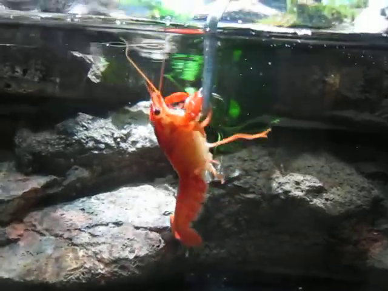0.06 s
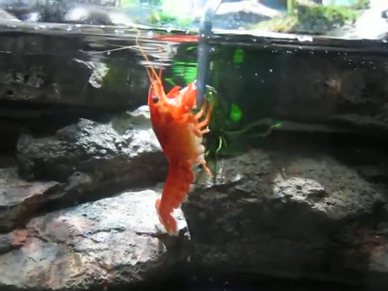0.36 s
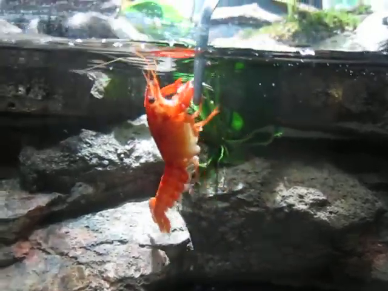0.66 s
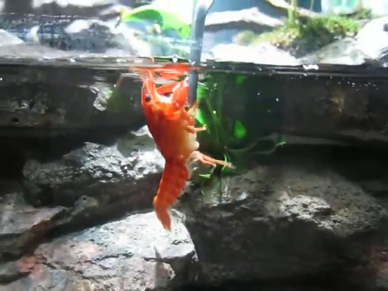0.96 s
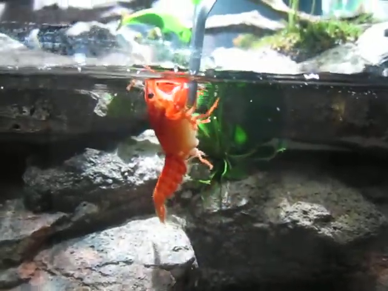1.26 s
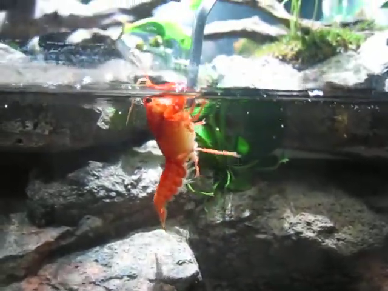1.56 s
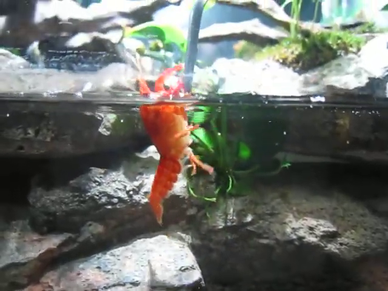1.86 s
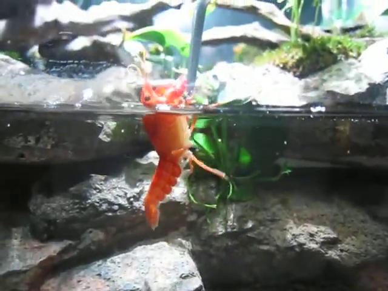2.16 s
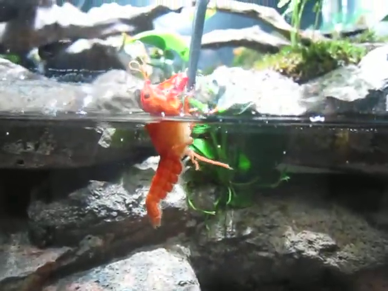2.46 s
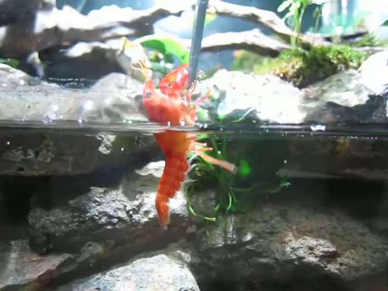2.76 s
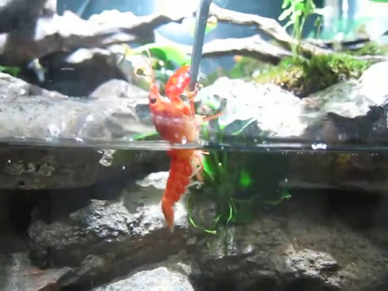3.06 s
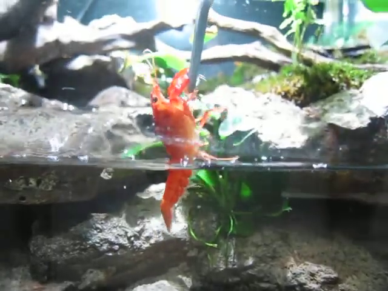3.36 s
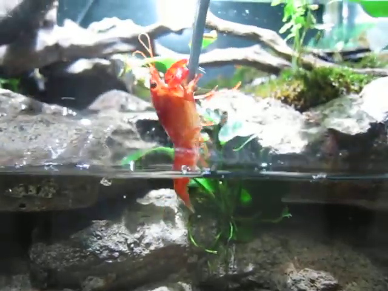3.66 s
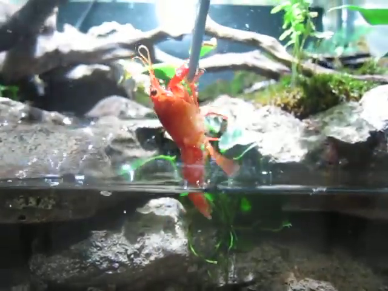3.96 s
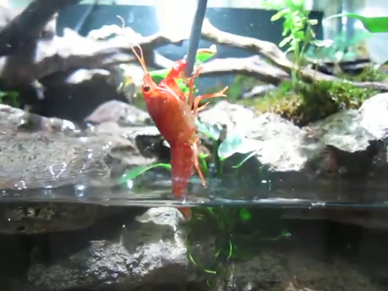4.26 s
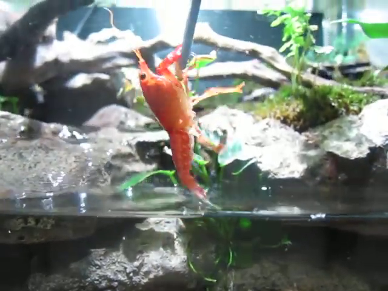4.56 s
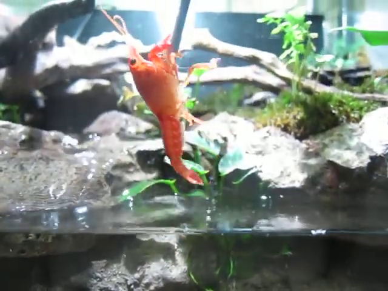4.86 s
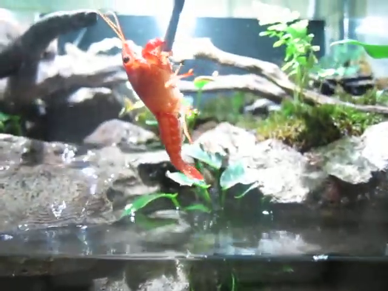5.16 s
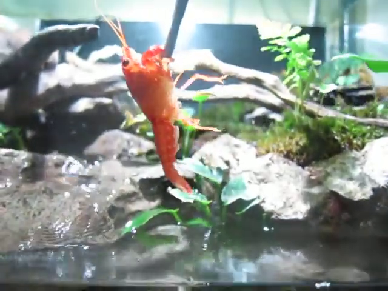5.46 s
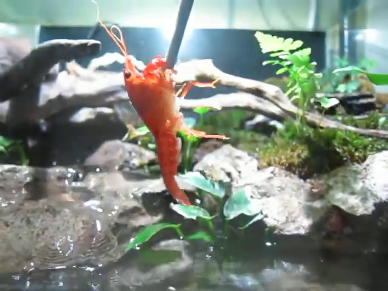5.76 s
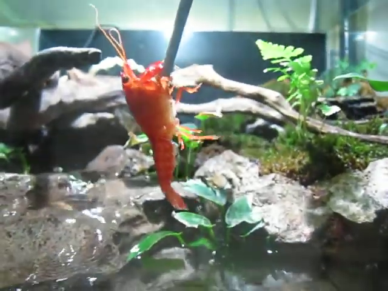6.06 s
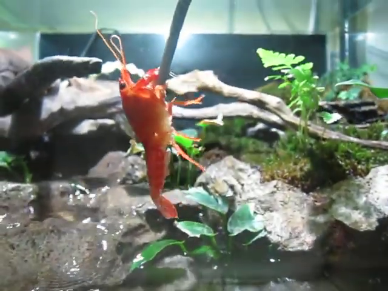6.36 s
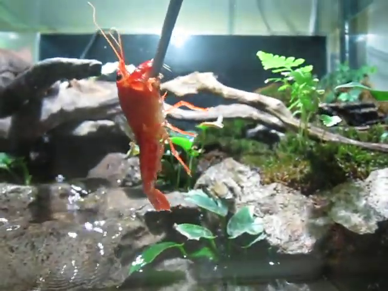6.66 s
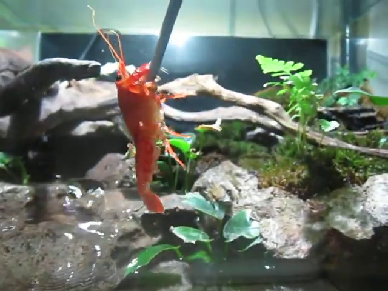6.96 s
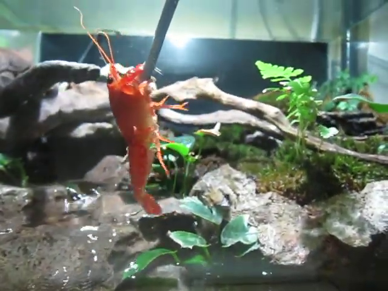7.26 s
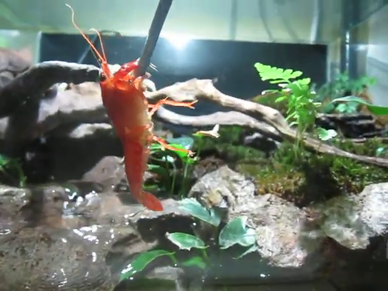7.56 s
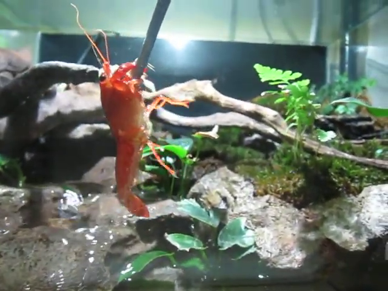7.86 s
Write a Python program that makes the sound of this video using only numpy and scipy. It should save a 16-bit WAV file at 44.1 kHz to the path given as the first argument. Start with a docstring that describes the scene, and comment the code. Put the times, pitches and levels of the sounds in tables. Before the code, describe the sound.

Water trickles and drips into an aquarium over a low pump hum, with three sharp clicks and soft microphone bumps.

```python
"""Beside an aquarium, heard through the microphone of a hand-held camera. A pump hums, a low drone climbs in
pitch, the camera takes soft bumps and rustles, and a thin whistle rises at the end. Water trickles into the
tank: a low gurgle, splashing, fine fizz and single ringing bubbles. A crayfish is lifted out with tongs; three
sharp clicks make the camera's gain control duck and slowly recover, and fainter ticks of spatter snap in
between."""
import sys
import numpy as np
from scipy import signal
from scipy.fft import rfft, irfft
from scipy.io import wavfile
from scipy.ndimage import uniform_filter1d, minimum_filter1d

SR = 44100
rng = np.random.default_rng(int(sys.argv[2]) if len(sys.argv) > 2 else 0)


def dump(signal):
    """Clip the signal to [-1, 1] and save it as 16-bit WAV at the path in sys.argv[1]."""
    limited = np.clip(np.atleast_2d(signal).T, -1, 1)
    pcm = np.round(limited * 32767).astype(np.int16)
    wavfile.write(sys.argv[1], SR, pcm)


N = 352800
TIME = np.arange(N) / SR


def undb(db):
    """Decibels to gain."""
    return 10 ** (np.asarray(db) / 20)


def unit(x):
    """Scale to an rms of 1."""
    return x / np.sqrt(np.mean(x ** 2))


def curves(table):
    """The columns of a table, joined by straight lines in time."""
    time_s, *columns = np.transpose(table)
    return [np.interp(TIME, time_s, column) for column in columns]


def add(out, start_s, x):
    """Mix x into out from start_s on."""
    i = int(np.clip(start_s * SR, 0, N - 1))
    out[i:i + len(x)] += x[:N - i]


def colour(x, gain):
    """Filter by a gain that is a function of frequency."""
    f = np.maximum(np.fft.rfftfreq(len(x), 1 / SR), 1)
    return irfft(rfft(x) * gain(f), len(x))


def slope(points, f):
    """Gain at the frequencies f of a spectrum of (frequency_hz, level_db) points."""
    hz, db = np.transpose(points)
    return undb(np.interp(np.log(f), np.log(hz), db))


def band(f, low_hz, high_hz):
    """Gain of a steep high-pass at low_hz and a steep low-pass at high_hz."""
    return ((1 + (low_hz / f) ** 12) * (1 + (f / high_hz) ** 12)) ** -.5


def walk(rate_hz):
    """Straight glides between random values; rms 1."""
    step = max(int(SR / rate_hz), 2)
    held = np.repeat(rng.standard_normal(N // step + 1), step)[:N]
    return unit(uniform_filter1d(held, step))


def tone(hz, db):
    """A sine of the given rms level; the pitch may move."""
    phase = np.cumsum(hz * np.ones(N)) / SR + rng.random()
    return np.sqrt(2) * undb(db) * np.sin(2 * np.pi * phase)


def decay(t, t60):
    """An exponential fall that is 60 dB down at t60."""
    return np.exp(-np.log(1000) * t / t60)


def damped(hz, t60_s):
    """A short ring that starts from rest."""
    t = TIME[:SR // 20]
    return np.sin(2 * np.pi * hz * t) * decay(t, t60_s)


# Rumble of the room around the tank: frequency_hz, density_db
RUMBLE_SPECTRUM = [(12, -3), (26, 4.5), (38, -0.5), (50, -12), (75, -3.5), (110, -12.5), (160, -21),
                   (300, -78)]
# The pump's deepest hum, at twice the mains frequency: time_s, level_db
PUMP_LEVEL = [(0.4, -34), (1.4, -32.5), (2.4, -35.5), (5.3, -34), (6.3, -32.5), (8, -31.5)]
# The pump's overtones: mains_multiple, level_db
PUMP_OVERTONES = [(5, -47), (6, -48), (7, -50), (8, -48.5), (11, -53.5)]
# The low drone behind it: time_s, level_db
DRONE_LEVEL = [(0, -34.5), (1, -29), (2.2, -30.5), (2.8, -35.5), (4.6, -45), (5.2, -28.5), (6.2, -28.5),
               (6.7, -38), (7.5, -31), (7.85, -23.5)]


def room(mains_hz=50, drone_start_hz=63.5, climb_hz_per_s=5.5, drone_top_hz=86.14):
    """The pump hums over a deep rumble and beats against an unsteady drone that climbs, then settles."""
    hum = tone(2 * mains_hz, curves(PUMP_LEVEL)[0])
    hum += sum(tone(multiple * mains_hz, db + walk(4.4)) for multiple, db in PUMP_OVERTONES)
    drone_hz = np.minimum(drone_start_hz + climb_hz_per_s * TIME, drone_top_hz)
    drone = tone(drone_hz * (1 + .012 * walk(6)), curves(DRONE_LEVEL)[0] + 1.5 * walk(8))
    rumble = unit(colour(rng.standard_normal(N), lambda f: slope(RUMBLE_SPECTRUM, f)))
    return hum + drone + undb(-28.5) * rumble


# Faint strands above the whistle: pitch_ratio, final_level_db
WHISTLE_STRANDS = [(1.09, -69), (1.33, -71), (1.43, -75)]


def whistle(start_s=7.35, rise_s=.65, from_hz=7050, to_hz=9130, from_db=-61, to_db=-46.5):
    """A thin, broken whistle slides up and swells ever faster, with airy strands above it."""
    rise = np.clip((TIME - start_s) / rise_s, 0, 1)
    hz = from_hz + (to_hz - from_hz) * rise ** 2
    db = from_db + (to_db - from_db) * rise ** 3
    strands = sum(tone(hz * ratio * (1 + .012 * walk(1200)), strand_db + 4 * walk(25))
                  for ratio, strand_db in WHISTLE_STRANDS)
    core = tone(hz * (1 + .014 * walk(1200)), db + 3 * walk(90))
    return (core + np.sqrt(rise) * strands) * (rise > 0)


# Colour of the water from beside the tank: frequency_hz, density_db
WATER_SPECTRUM = [(140, -4), (195, -2), (270, -3.5), (420, -7), (560, -8), (740, -18.5), (1100, -19.5),
                  (1550, -20), (2140, -19), (7000, -19), (8600, -24), (10500, -29), (16000, -43.5)]
# Resonances of the air space over the water: centre_hz, width_hz, boost_db
AIR_RESONANCES = [(1360, 90, 3.5), (2150, 180, 3), (3100, 260, 2), (4020, 300, 3), (5500, 450, 3),
                  (6900, 400, 2.5), (8300, 700, 3)]
# Reflections off the glass, nearest wall first: delay_s, level_db
GLASS_WALLS = [(.0025, -16), (.0043, -18), (.0071, -18)]


def tank(f):
    """Gain of the water's colour, lifted by the air resonances and rippled by the wall reflections."""
    reflections = sum(undb(db) * np.exp(-2j * np.pi * f * delay_s) for delay_s, db in GLASS_WALLS)
    boost_db = sum(db / (1 + (2 * (f - hz) / width_hz) ** 2) for hz, width_hz, db in AIR_RESONANCES)
    return slope(WATER_SPECTRUM, f) * np.abs(1 + reflections) * undb(boost_db)


def glass_echo(x, t60_s, wet_db):
    """Dense, short reflections between the glass walls."""
    t = TIME[:SR // 3]
    tail = rng.standard_normal(len(t)) * decay(t, t60_s) * (t > .002)
    return x + undb(wet_db) * signal.fftconvolve(x, tail / np.linalg.norm(tail))[:N]


def spray(low_hz, high_hz, spread_db, flicker_db, surge_db, bands):
    """Countless tiny, uneven bursts in the tank; the bands flicker on their own and surge together."""
    edges = np.geomspace(low_hz, high_hz, bands + 1)
    out = np.zeros(N)
    for low, high in zip(edges, edges[1:]):
        bursts = rng.standard_normal(N) * np.repeat(undb(spread_db * rng.standard_normal(N // 20)), 20)
        out += colour(bursts, lambda f: band(f, low, high)) * undb(flicker_db * walk(45))
    return unit(colour(out, tank) * undb(surge_db * walk(55)))


# Handling noise close to the microphone: middle_s, length_s, rub_level_db
HANDLING_RUSTLES = [(0.095, 0.37, -41.5), (0.593, 0.18, -32), (5.588, 0.072, -41)]


def rustles(ring_over_rub_db=3):
    """Something rubs near the microphone: a dull, grainy noise with a deep ring swells and stops."""
    swell = sum(undb(db) * np.cos(np.pi * np.clip((TIME - middle_s) / length_s, -.5, .5))
                for middle_s, length_s, db in HANDLING_RUSTLES)
    rub = spray(190, 1950, spread_db=3, flicker_db=2, surge_db=2, bands=3)
    # The crossed band edges leave one narrow peak near 142 Hz.
    ring = unit(colour(rng.standard_normal(N), lambda f: band(f, 147.84, 137.06)))
    return swell * (rub + undb(ring_over_rub_db) * ring)


# Bumps on the camera, right at the microphone: start_s, pitch_hz, peak_db, length_s
CAMERA_BUMPS = [(1.433, 350, -21, 0.01), (1.438, 114, -15.5, 0.037), (6.442, 64.5, -11, 0.044),
                (6.444, 125, -24, 0.043), (7.194, 64.5, -5, 0.02)]


def bumps():
    """Soft knocks on the camera body swing for a few cycles."""
    out = np.zeros(N)
    for start_s, hz, db, length_s in CAMERA_BUMPS:
        t = TIME[:int(length_s * SR)]
        swing = np.cos(2 * np.pi * hz * (t - length_s / 2))
        add(out, start_s, -undb(db) * np.sin(np.pi * t / length_s) * swing)
    return out


def bubble(hz, cycles, glide):
    """A bubble rings, dies away and rises in pitch as it nears the surface."""
    age = np.linspace(0, 1, int(cycles * SR / hz))
    phase = cycles * (age + glide * age ** 2 / 2)
    onset = 1 - np.exp(-age / .018)
    return np.sin(2 * np.pi * phase) * decay(age, 1) * onset


# Runs of bubbles in the tank, each around one pitch: start_s, end_s, pitch_hz, width_hz, level_db
BUBBLE_RUNS = [(2.15, 2.45, 310, 52, -38.5), (3.946, 3.975, 302, 40, -27.5), (3.85, 4.223, 2300, 230, -51),
               (4.46, 4.719, 2340, 180, -49.5), (5.47, 5.6, 2290, 280, -45), (0.05, 0.33, 1365, 78, -51.5),
               (2.87, 3.33, 5400, 280, -55.5), (7.72, 8.001, 2130, 250, -48.5),
               (7.83, 7.94, 2800, 910, -45), (7.37, 8.0, 6000, 200, -55.5)]


def bubble_runs():
    """Quick runs of like-sized bubbles merge into a rough note."""
    out = np.zeros(N)
    for start_s, end_s, hz, width_hz, db in BUBBLE_RUNS:
        run, length_s = np.zeros(N), end_s - start_s
        for when, detune, strength in rng.random((160, 3)):
            ring = bubble(hz + width_hz * (detune - .5), cycles=6 * hz / width_hz, glide=.015)
            add(run, start_s + when * length_s, strength * ring)
        out += unit(run) * undb(db) * np.sqrt(length_s * SR / N)  # level over the run's own length
    return out


# The loudest drops on the water's surface: start_s, pitch_hz, relative_level_db
DROPS = [(.178, 6600, -28), (.325, 1365, -35), (.425, 2400, -29.5), (.889, 2130, -31.5),
         (1.251, 1790, -37.5), (1.479, 1820, -34), (1.59, 4170, -33), (1.655, 3440, -32), (1.72, 3150, -31),
         (1.96, 3380, -32.5), (2.04, 4070, -35.5), (2.124, 2070, -35), (2.201, 5720, -31),
         (2.398, 4920, -31.5), (2.453, 1320, -30), (2.53, 2900, -33.5), (2.636, 3970, -33),
         (3.284, 6360, -34), (3.402, 2980, -32), (3.797, 2940, -33), (4.506, 2580, -31.5),
         (4.572, 1360, -31.5), (4.836, 2100, -32.5), (5.056, 3320, -35), (5.306, 2970, -37),
         (5.394, 2070, -30.5), (5.778, 3260, -31), (5.892, 2140, -25.5), (5.934, 2130, -38),
         (6.172, 2160, -33), (6.204, 3240, -33), (6.294, 2174, -33), (6.3, 3050, -33), (6.525, 2950, -34),
         (6.83, 3310, -34.5), (7.176, 6630, -28.5), (7.29, 8500, -31.5), (7.295, 2980, -33),
         (7.5, 3300, -32), (7.539, 2180, -32.5), (7.886, 4630, -34.5)]


def drips():
    """A drop makes one main bubble and a fading cluster of like size; smaller bubbles come in numbers."""
    out = np.zeros(N)
    for start_s, hz, db in DROPS:
        add(out, start_s, undb(db - 2) * bubble(hz, cycles=124, glide=.04))
        for lag, detune in rng.random((10, 2))[:int(hz / 500)]:
            ring = bubble(hz * (1 + .2 * (detune - .5)), cycles=75, glide=.06)
            add(out, start_s + .05 * lag, undb(db - 3.5 - 7 * lag) * ring)
    return glass_echo(out, t60_s=.16, wet_db=-4)


def swarm(low_hz, high_hz, cycles, range_db, count):
    """Bubbles born at random moments: many faint ones, a few strong."""
    out = np.zeros(N)
    for when, pitch, strength in rng.random((count, 3)):
        ring = bubble(low_hz * (high_hz / low_hz) ** pitch, cycles, glide=.086)
        add(out, when * N / SR, undb(range_db * strength ** 2) * ring)
    return unit(glass_echo(colour(out, tank), t60_s=.09, wet_db=-9))


# The stream where it meets the water, before each layer's trim: time_s, gurgle_db, splash_db, fizz_db
STREAM_LEVELS = [(0.0, -33.5, -44.5, -43), (0.38, -36.5, -46, -45), (0.67, -31, -42, -43.5),
                 (0.96, -38, -48, -43.5), (2.0, -37.5, -49.5, -46.5), (3.15, -32.5, -44.5, -42.5),
                 (3.57, -35.5, -48.5, -45), (4.07, -33.5, -46, -43.5), (4.33, -34, -50, -45.5),
                 (4.56, -35, -44, -42.5), (4.76, -34.5, -49, -44.5), (5.0, -32.5, -44.5, -41),
                 (5.32, -33.5, -44.5, -42.5), (5.58, -31.5, -39, -39), (5.75, -33.5, -44.5, -42),
                 (6.34, -34, -45.5, -45), (6.68, -37, -52.5, -48), (6.82, -34.5, -47, -44),
                 (8.0, -33, -47.5, -45.5)]
# Brief surges of the stream: middle_s, length_s, splash_rise_db
STREAM_SURGES = [(0.478, 0.11, 5.5), (0.623, 0.072, 8), (1.764, 0.037, 8.5), (4.156, 0.34, 4.5),
                 (6.184, 0.2, 4), (7.194, 0.11, 3)]


def trickle(gurgle_share=.61, fizz_share=.79):
    """Falling water gurgles, splashes and fizzes; bubbling follows the splash, spatter the fizz."""
    rise_db = sum(db * np.cos(np.pi * np.clip((TIME - middle_s) / length_s, -.5, .5)) ** 2
                  for middle_s, length_s, db in STREAM_SURGES)
    layer_rises_db = np.outer([gurgle_share, 1, fizz_share], rise_db)
    gurgle_db, splash_db, fizz_db = curves(STREAM_LEVELS) + layer_rises_db
    gurgle = spray(170.5, 916, spread_db=2, flicker_db=1.06, surge_db=.76, bands=3) * undb(gurgle_db - 3.5)
    splash = spray(824, 3800, spread_db=.5, flicker_db=2.5, surge_db=.56, bands=5) * undb(splash_db - 2)
    fizz = spray(3520, 14200, spread_db=2, flicker_db=2, surge_db=1.43, bands=5) * undb(fizz_db - 1.26)
    bubbling = swarm(2033, 4670, cycles=123, range_db=10.5, count=1500) * undb(splash_db - 4.5)
    spatter = swarm(4480, 11130, cycles=104, range_db=12, count=900) * undb(fizz_db - 10)
    return gurgle + (splash + bubbling) * undb(1.3 * walk(11)) + (fizz + spatter) * undb(.57 * walk(13))


# Sharp clicks at the tank, and fainter ticks of spatter played the same way: start_s, peak_db, snap_hz,
# relative_knock_db, relative_tail_db
CLICKS_AND_TICKS = [(0.6543, 5, 4370, -16, 1.5), (0.7085, 2.5, 4710, -24, -2), (3.488, -23, 7540, -12, 7),
                    (5.585, -20.5, 4550, 6, 3), (5.651, 7, 7330, -7, 2), (6.221, -18, 7550, -13, 3)]
# What each contact rings with: pitch_hz, relative_level_db, t60_s
CONTACT_MODES = [(1900, -22.5, 0.013), (2940, -18, 0.0079), (3650, -31, 0.027), (3910, -20, 0.016),
                 (4770, -15.5, 0.0093), (5250, -24, 0.011), (5670, -23, 0.014), (6490, -20, 0.015),
                 (7200, -18, 0.012)]


def clicks(strike_t60_s=.003, knock_hz=1484, crackle_db=-15, crackle_t60_s=.016):
    """A hard contact, or a faint spatter tick: a snap, a dull knock and a ringing, crackling tail, echoed by
    the nearest wall."""
    out, t = np.zeros(N), TIME[:SR // 20]
    wall_s, wall_db = GLASS_WALLS[0]
    ring = sum(undb(db) * damped(hz, t60_s) for hz, db, t60_s in CONTACT_MODES)
    onset = 1 - np.exp(-(t / .0005) ** 2)
    for start_s, peak_db, snap_hz, knock_db, tail_db in CLICKS_AND_TICKS:
        crackle = undb(crackle_db) * rng.standard_normal(len(t)) * decay(t, crackle_t60_s)
        around_snap = signal.butter(4, [.34 * snap_hz, 1.27 * snap_hz], "band", fs=SR, output="sos")
        tail = signal.sosfilt(around_snap, ring + crackle)
        strike = damped(snap_hz, strike_t60_s) + undb(knock_db) * damped(knock_hz, strike_t60_s)
        click = (strike + undb(tail_db) * tail) * onset
        click *= undb(peak_db) / np.abs(click).max()
        add(out, start_s, click)
        add(out, start_s + wall_s, undb(wall_db) * click)
    return out


def scene():
    """All sources at one microphone beside the tank."""
    return (trickle() + drips() + bubble_runs() + clicks() + bumps() + room() + whistle() + rustles())[None]


def gain_control(x, ceiling_db, attack_s, hold_s, release_db_per_s):
    """A peak over the ceiling turns the gain down within an instant; it is held, then creeps back."""
    over_db = np.maximum(20 * np.log10(np.abs(x) + 1e-9) - ceiling_db, 0)
    recovery_db = release_db_per_s * TIME
    cut_db = np.maximum.accumulate(over_db + recovery_db) - recovery_db
    half_hold = int(hold_s * SR / 2)
    gain_db = minimum_filter1d(-cut_db, 2 * half_hold + 1, origin=half_hold)
    return x * undb(uniform_filter1d(gain_db, int(attack_s * SR)))


def record(dry, clip_db=-2.2, top_hz=15750):
    """The camera ducks after loud clicks, clips the swings that slip past and cuts the highest treble."""
    ducked = gain_control(dry[0], ceiling_db=-2, attack_s=.00059, hold_s=.24, release_db_per_s=17.5)
    clipped = np.clip(ducked, -undb(clip_db), undb(clip_db))
    low_pass = signal.ellip(8, .2, 70, top_hz, fs=SR, output="sos")
    return signal.sosfilt(low_pass, clipped)[None]


dry = scene()
out = record(dry)
dump(out)
```